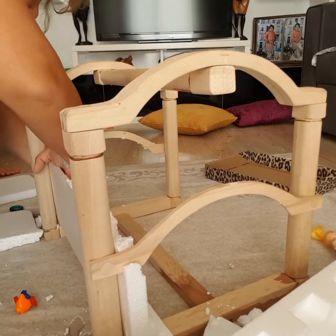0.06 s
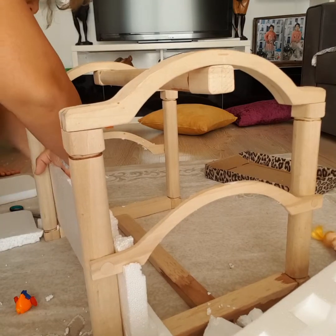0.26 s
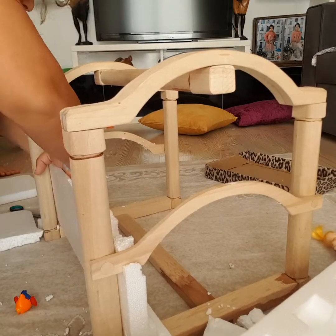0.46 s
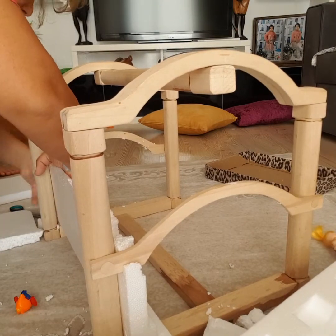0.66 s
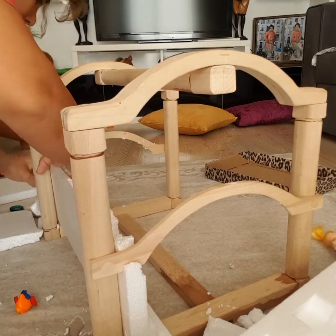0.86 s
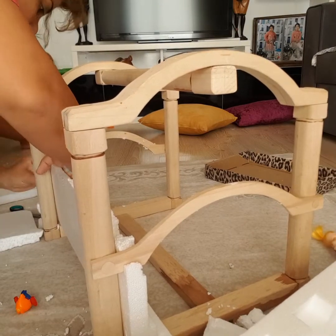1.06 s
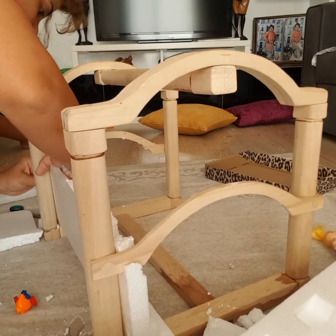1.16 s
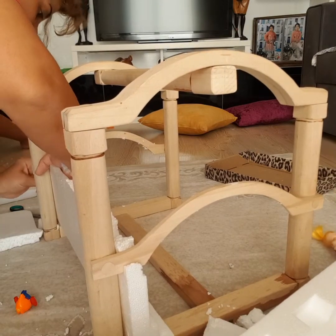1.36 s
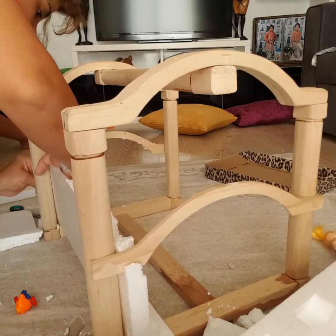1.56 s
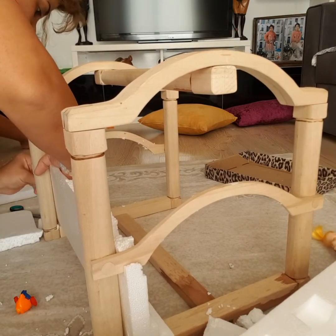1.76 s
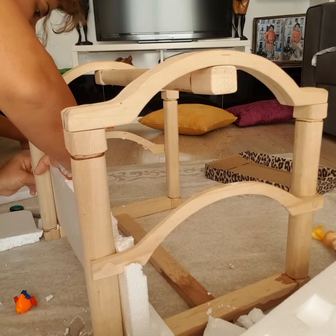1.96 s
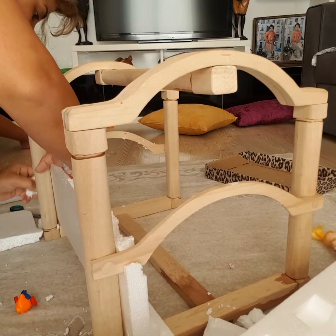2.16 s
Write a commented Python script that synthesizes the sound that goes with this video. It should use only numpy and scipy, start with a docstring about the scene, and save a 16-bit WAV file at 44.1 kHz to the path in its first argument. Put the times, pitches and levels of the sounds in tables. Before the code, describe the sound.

Polystyrene foam creaks, crunches and snaps as it is wedged into a wooden frame.

```python
"""First you hear a creak, a little to the left: a polystyrene sheet is being wedged into a wooden frame.
The foam sticks and slips in quick jerks, gives way with a crunch that thuds through the frame,
and snaps twice more. Soft rubs of its beads and a hollow tap follow, then a pause and a second,
lighter push. Around it all is a living room with a short echo and a faint hum."""
import sys
import numpy as np
from scipy import signal
from scipy.fft import rfft, irfft
from scipy.io import wavfile
from scipy.ndimage import uniform_filter1d

SR = 44100
rng = np.random.default_rng(int(sys.argv[2]) if len(sys.argv) > 2 else 0)


def inscribe(sig):
    """Save sig as 16-bit PCM at rate SR to the path in sys.argv[1].

    A 1-D sig is mono; a 2-D sig holds one channel per row.
    Samples are clipped to [-1, 1] before scaling.
    """
    pcm = np.round(np.clip(np.atleast_2d(sig).T, -1, 1) * 32767)
    wavfile.write(sys.argv[1], SR, pcm.astype(np.int16))


N = 97020
T = np.arange(N) / SR

# The foam sounds in three bands: body, middle and treble. body_db and middle_db compare with the treble.
# How the creak changes: time_s, jerks_per_s, level_db, body_db, middle_db, unevenness (0 to 1)
CREAK_PATH = [(.007, 81.8, -29.5, -17, -0.5, 0.02), (0.026, 136, -24.5, -18, -6.5, 0.03),
              (0.059, 135, -26.5, -17, -6, 0.03), (0.085, 102, -29, -2.5, -4.5, 0.27),
              (0.129, 103.7, -28, -1.5, 1.5, .2), (0.177, 86, -28.5, -8.5, -1.5, .05),
              (0.236, 100, -31, -3.5, -1, 0.08)]
# Beads scraping and crushing: peak_s, level_db, rise_s, fall_s, body_db, middle_db
BEAD_RUBS = [(.135, -46, 0.087, 0.083, 6, 6), (.243, -26.5, .011, 0.022, 0, -6),
             (.261, -23, 0.012, 0.0089, 5.5, -2), (0.278, -22, 0.015, 0.018, 0.5, 1.5),
             (.478, -40.5, 0.035, 0.069, -14, -10), (0.512, -24.5, 0.0037, 0.01, -20, -12),
             (0.591, -45.5, 0.11, 0.021, -0.5, 3.5), (.772, -56.5, 0.042, 0.027, 8.5, -41),
             (0.868, -51, 0.04, 0.023, -16, -1), (0.912, -44.5, 0.026, 0.015, -4, -2.5),
             (1.027, -48.5, 0.027, 0.023, 3, -9), (1.085, -62, 0.036, 0.083, 18, -25),
             (1.168, -46, 0.019, 0.012, 7.5, -11), (1.335, -67, 0.058, 0.12, -7, -12),
             (1.785, -61, 0.031, 0.045, -13.5, -10.5), (1.838, -53, 0.022, 0.019, -8, -9),
             (1.87, -38.5, 0.012, 0.045, 4, -3), (1.944, -44.5, 0.0095, 0.15, 2.5, -4),
             (1.979, -33.5, 0.005, 0.011, -19, -1), (1.992, -31.5, 0.0035, 0.01, -0.5, 3),
             (2.05, -60, 0.008, 0.015, 20, -15), (2.197, -45.5, 0.022, 0.024, -2, 0.5)]
# The foam cracking: peak_s, level_db, fall_s, body_db, middle_db
FOAM_SNAPS = [(0.256, -12, 0.0029, -6.5, 3.5), (0.2678, -34, 0.0016, -2, 12), (0.273, -15, .002, 4, -30),
              (0.4052, -30, 0.0011, -15, -15), (0.4727, -22.5, 0.00057, -25, -28),
              (0.5091, -14, 0.0012, -14, -38), (0.5164, -18, 0.00082, -14, -18),
              (0.5923, -23, 0.0033, -0.5, -1), (0.7423, -44.5, 0.00078, -1, -29),
              (0.8489, -37.5, 0.0021, 4, -12), (1.0218, -42, 0.00089, -0.5, 9.5),
              (1.188, -53.5, 0.0023, 24.5, -17), (1.4885, -49.5, 0.0031, -23, -11),
              (1.8353, -29.5, 0.0024, -13.5, -8), (1.868, -30.5, 0.0025, -6, 9),
              (2.0189, -24.5, 0.003, -1, -6), (2.1454, -37.5, 0.0024, 8, 5.5)]
# How alike the foam is in both ears (0 to 1): body, middle, treble
BAND_LIKENESS = [1, .5, 0.13]
# Pitches the sheet makes louder or softer: pitch_hz, width_hz, gain_db
SHEET_TONE = [(350, 110, -0.5), (480, 370, 2.5), (858, 920, -7.5), (1530, 300, 3.5), (1790, 410, -2),
              (2780, 1400, 2.5), (4490, 830, -3.5), (6970, 1500, 2), (8430, 690, -3.5)]
# Shoves that shake the frame: peak_s, level_db, rise_s, fall_s
FRAME_SHOVES = [(.15, -57, 0.06, 0.097), (.278, -38, 0.008, 0.021), (.38, -52, .03, 0.069),
                (0.59, -64, 0.058, 0.2), (1.19, -68, 0.21, 0.085), (1.888, -55.5, 0.016, 0.059),
                (2.06, -57.5, 0.041, 0.071)]
# Short squeaks where the foam is pinched, airy hiss where it is lightly brushed:
# centre_s, pitch_hz, gain_db
BRIEF_RINGS = [(.18, 3130, 6.5), (.265, 2600, 7.5), (.275, 1453, 4), (.595, 3840, 7.5), (.595, 1340, 5.5),
               (.595, 840, 6.5), (.905, 3500, 11), (.905, 6450, 7), (1.165, 2600, 9.5), (1.335, 13000, 9.5),
               (1.775, 13000, 10.5), (1.875, 2500, 6), (2.147, 2630, 6)]
# Blows to the frame as the foam gives way: start_s, level_db
FRAME_THUDS = [(.257, -30), (.2685, -26.5)]
# The frame's own notes: pitch_hz, level_db, ring_s (the time to fade by 60 dB)
FRAME_NOTES = [(79, 0, 0.14), (110, -5.5, 0.13), (173.5, -5, 0.09), (255, -3, .065)]
# Hollow taps on the sheet: start_s, level_db, pitch_hz, ring_s
SHEET_TAPS = [(1.1843, -43.5, 428, 0.14), (1.8687, -25, 560, 0.015)]
# The notes inside each tap: pitch_ratio, level_db
TAP_NOTES = [(.56, 2), (.8, -11), (0.999, 3.5), (1.3, -11), (2.05, -14.5)]
# The room's echo: pitch_hz, ring_s, likeness (of left and right, 0 to 1)
ROOM_ECHO = [(100, 0.22, 0.71), (300, 0.31, 0.98), (736, 0.35, 0.49), (2000, 0.34, 0.6), (6000, 0.23, .05),
             (15000, 0.19, .05)]
# The noise of still air: pitch_hz, gain_db (added to AIR_DB)
AIR_TONE = [(25, -14), (60, -0.5), (130, -10), (260, -11.5), (1000, -24.5), (3000, -31), (9000, -27),
            (15000, -16)]
# Faint household hum: pitch_hz, level_db
HUM_NOTES = [(129, -73.5), (246, -82)]

JERK_FALL_S, CRACK_RISE_S = 0.0011, 0.00035
BODY_LOW_HZ, BODY_TOP_HZ, MIDDLE_TOP_HZ, SHEET_TOP_HZ = 153, 846, 4070, 0.45 * SR
CLUMP_S = 0.0024  # beads let go in clusters about this long
SHUDDER_BAND_HZ, SHUDDER_SIDE_DB = [50.3, 124], -10.5
RING_HOLD_S = 0.05
LEFT_DB, LEFT_LEAD_S, CENTRED_BELOW_HZ = 3, 0.00008, 620
FOAM_ECHO_DB, KNOCK_ECHO_DB, ECHO_BUILD_S = -0.5, -14, 0.00043
AIR_DB, HUM_WAVER_HZ = -52, 6.3


def from_db(db):
    """Turns decibels into a number to multiply by."""
    return 10 ** (np.asarray(db) / 20)


def butter(x, hz, kind, order=2):
    """A smooth filter that keeps the lows, the highs or a band."""
    return signal.sosfilt(signal.butter(order, hz, kind, fs=SR, output="sos"), x + 1e-18)


def at_hz(table, hz, column=1):
    """Looks up a pitch in a table, gliding between its rows."""
    table = np.array(table)
    return np.interp(np.log(hz), np.log(table[:, 0]), table[:, column])


def swell(peak_s, rise_s, fall_s):
    """Loudness that climbs smoothly to a peak, then dies away."""
    return np.exp(-(np.minimum(T - peak_s, 0) / rise_s) ** 2 - np.maximum(T - peak_s, 0) / fall_s)


def spread(mid, side, likeness):
    """Mixes two noises into left and right; a likeness of 1 makes both ears the same."""
    return np.sqrt((1 + likeness) / 2) * mid + np.sqrt((1 - likeness) / 2) * np.array([side, -side])


def noise_bands(size):
    """Splits stereo noise into narrow bands, most alike in both ears in the bass."""
    hz = np.arange(size // 2 + 1) * SR / size
    edges_hz = 20 * 2 ** (np.arange(31) / 3)  # three bands to an octave
    white = rfft(rng.standard_normal((2, size)))
    for low, high in zip(edges_hz, edges_hz[1:]):
        mid, side = irfft(white * ((hz >= low) & (hz < high)), size)
        centre_hz = np.sqrt(low * high)
        yield centre_hz, spread(mid, side, at_hz(ROOM_ECHO, centre_hz, column=2))


def bead_slips(events, grain_db, clump_db):
    """Swarms of tiny slips swell and fade, giving stereo crackle for body, middle and treble."""
    signs = rng.choice([-1, 1], (2, N))
    sizes = np.minimum(rng.exponential(1, (2, N)), 4)
    clumps = np.clip(rng.standard_normal(N), -2, 2)
    clumps = np.interp(T / CLUMP_S, np.arange(N), clumps)
    swarm = signs * from_db(grain_db * sizes + clump_db * clumps)
    energy = np.mean(swarm ** 2, axis=0)
    power = 0
    for peak_s, db, rise_s, fall_s, body_db, middle_db in events:
        shape = swell(peak_s, rise_s, fall_s) ** 2
        shape *= np.sum(shape) / (np.sum(shape * energy) + 1e-20)  # same level however big the slips
        band_gains = from_db(db + np.array([body_db, middle_db, 0]))
        power = power + band_gains[:, None] ** 2 * shape
    likeness = np.array(BAND_LIKENESS)[:, None, None]
    return np.sqrt(power)[:, None] * spread(swarm[0], swarm[1], likeness)


def creak():
    """Lists the jerks as foam sticks and slips on wood, even at first, then duller and more ragged."""
    times, *columns = np.transpose(CREAK_PATH)
    now_s, jerks = times[0], []
    for late, strong in rng.standard_normal((45, 2)):
        rate, db, body_db, middle_db, uneven = [np.interp(now_s, times, column) for column in columns]
        if now_s < times[-1]:
            jerk_db = db + 6 * uneven * strong
            jerks.append((now_s, jerk_db, CRACK_RISE_S, JERK_FALL_S, body_db, middle_db))
        now_s += np.exp(uneven * late) / rate
    return jerks


def foam_sheet(body, middle, treble):
    """The sheet colours the slips inside it, lifting some pitches and softening others."""
    sound = (butter(body, [BODY_LOW_HZ, BODY_TOP_HZ], "band")
             - butter(middle, [BODY_TOP_HZ, MIDDLE_TOP_HZ], "band")
             + butter(treble, MIDDLE_TOP_HZ, "high", order=4))
    for hz, width_hz, db in SHEET_TONE:  # one broad bump or dip per row
        gain, width = from_db(db / 2), np.tan(np.pi * width_hz / SR)
        tuning = -2 * np.cos(2 * np.pi * hz / SR)
        sound = signal.lfilter([1 + width * gain, tuning, 1 - width * gain],
                               [1 + width / gain, tuning, 1 - width / gain], sound)
    return butter(sound, SHEET_TOP_HZ, "low", order=1)


def background():
    """Low room rumble, thin hiss and a faint, wavering hum."""
    sound = sum(from_db(AIR_DB + at_hz(AIR_TONE, hz)) * noise for hz, noise in noise_bands(N))
    wavers = butter(rng.standard_normal((len(HUM_NOTES), N)), HUM_WAVER_HZ, "low")
    for (hz, db), waver in zip(HUM_NOTES, wavers):
        sound += from_db(db) * (1 + 0.5 * waver / waver.std()) * np.sin(2 * np.pi * hz * T)
    return sound


def rubs():
    """Beads scrape and crush, letting go in clusters."""
    return bead_slips(BEAD_RUBS, grain_db=4, clump_db=3)


def shudder():
    """The frame rumbles low each time it is shoved."""
    mid, side = butter(rng.standard_normal((2, N)), SHUDDER_BAND_HZ, "band")
    level = sum(from_db(db) * swell(peak_s, rise_s, fall_s) for peak_s, db, rise_s, fall_s in FRAME_SHOVES)
    mid = mid / np.sqrt(uniform_filter1d(mid ** 2, size=2048) + 1e-20)  # hold the noise steady
    side = from_db(SHUDDER_SIDE_DB) * side / side.std()
    return level * np.array([mid + side, mid - side])


def brief_rings(foam):
    """Slips ring briefly at one pitch: a squeak where foam is pinched, a hiss where lightly brushed."""
    sound = 0
    for centre_s, hz, db in BRIEF_RINGS:
        moment = np.exp(-((T - centre_s) / RING_HOLD_S) ** 4)
        ringing = signal.lfilter(*signal.iirpeak(hz, Q=3.5, fs=SR), foam * moment + 1e-18)
        sound = sound + (from_db(db) - 1) * ringing  # only the extra, to add to the foam
    return sound


def snaps():
    """Lists the cracks of the foam, each a sudden, very short burst of slips."""
    return [(peak_s, db, CRACK_RISE_S, fall_s, body_db, middle_db)
            for peak_s, db, fall_s, body_db, middle_db in FOAM_SNAPS]


def knock(start_s, level_db, notes, contact_s):
    """A soft blow sets several notes ringing; longer contact gives a gentler start."""
    age_s = np.maximum(T - start_s, 0)
    ringing = sum(from_db(level_db + db - 60 * age_s / ring_s) * np.sin(2 * np.pi * hz * age_s)
                  for hz, db, ring_s in notes)
    return (1 - np.exp(-age_s / contact_s)) * ringing


def thuds():
    """The wooden frame booms briefly as the foam gives way."""
    return sum(knock(start_s, db, FRAME_NOTES, contact_s=0.00092) for start_s, db in FRAME_THUDS)


def taps():
    """The sheet bumps the frame with a hollow knock, higher and shorter where it is held tight."""
    sound = 0
    for start_s, level_db, hz, ring_s in SHEET_TAPS:
        notes = [(hz * ratio, db, ring_s) for ratio, db in TAP_NOTES]
        sound = sound + knock(start_s, level_db, notes, contact_s=0.0013)
    return sound


def place_left(sound):
    """Sound reaches the left ear first, and is louder there above the bass."""
    sound = np.array([sound[0], np.roll(sound[1], int(LEFT_LEAD_S * SR))])
    bass = butter(sound, CENTRED_BELOW_HZ, "low", order=1)
    return bass + (sound - bass) * from_db([[LEFT_DB / 2], [-LEFT_DB / 2]])


def room_echo(sound):
    """The room adds a short wash of echo that dies sooner in the treble."""
    age_s, tail = T[:N // 3], 0
    for hz, noise in noise_bands(len(age_s)):
        shape = (1 - np.exp(-age_s / ECHO_BUILD_S)) * from_db(-60 * age_s / at_hz(ROOM_ECHO, hz))
        tail = tail + noise * shape / np.sqrt(np.sum(shape ** 2))
    spectrum = rfft(tail, N)
    spectrum /= np.sqrt(uniform_filter1d(np.abs(spectrum) ** 2, size=60) + 0.01)  # no pitch sticks out
    even_tail = irfft(spectrum, N)[:, :len(age_s)]
    return signal.fftconvolve(sound, even_tail, axes=1)[:, :N]


def scene():
    """Foam and frame in the room; the brief rings and the shudder get no echo."""
    cracks = bead_slips(creak() + snaps(), grain_db=3.5, clump_db=0)
    foam = foam_sheet(*(cracks + rubs()))
    knocks = thuds() + taps()
    direct = place_left(foam + brief_rings(foam) + knocks + shudder())
    echo = room_echo(from_db(FOAM_ECHO_DB) * foam + from_db(KNOCK_ECHO_DB) * knocks)
    return direct + echo + background()


def record(dry):
    """Cuts off the very highest treble steeply."""
    cutoff_hz = 15800
    return signal.sosfilt(signal.ellip(10, 0.2, 80, cutoff_hz, fs=SR, output="sos"), dry)


dry = scene()
out = record(dry)
inscribe(out)
```